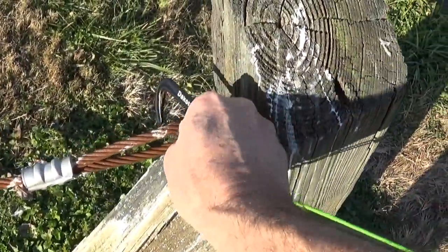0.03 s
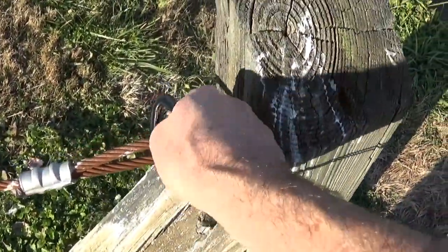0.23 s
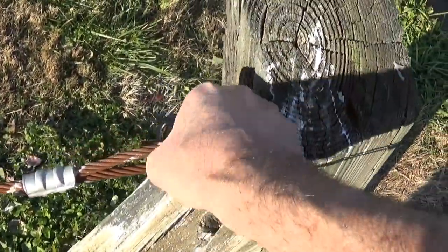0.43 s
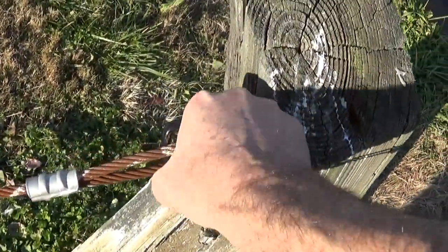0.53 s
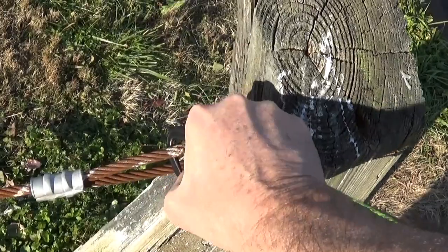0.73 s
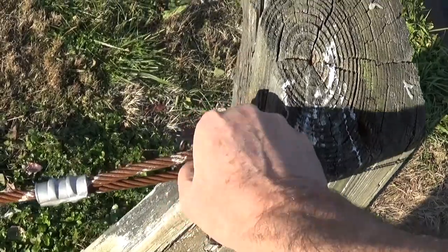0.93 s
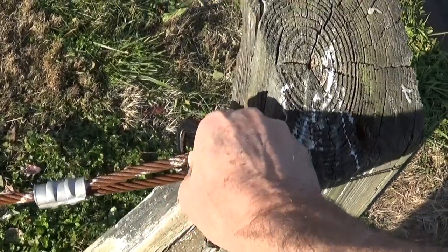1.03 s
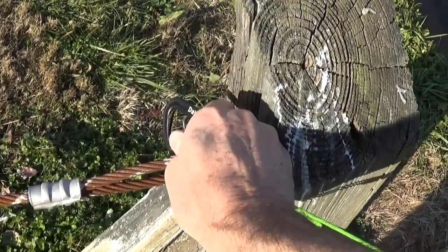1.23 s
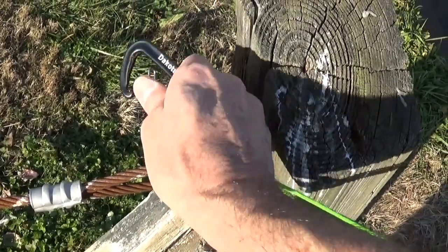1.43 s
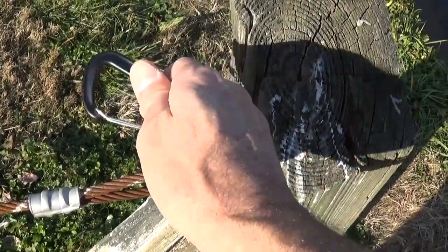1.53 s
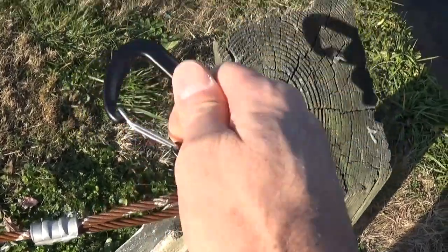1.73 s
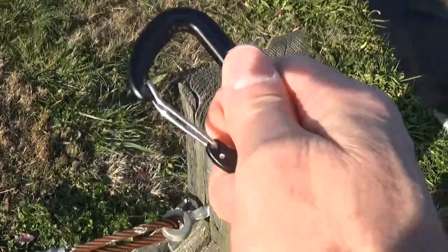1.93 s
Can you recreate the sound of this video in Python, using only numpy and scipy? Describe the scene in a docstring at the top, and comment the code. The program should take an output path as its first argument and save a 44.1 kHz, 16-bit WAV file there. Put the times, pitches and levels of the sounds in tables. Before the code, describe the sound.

A metal carabiner scrapes and clicks off a taut steel cable, then its gate snaps shut outdoors.

```python
"""A hook scrapes and knocks over the strands as a hand works a carabiner off a taut steel cable outdoors.
Random slips and snags drive damped modes and dense noise bursts of cable, fittings and hook;
single strikes ring them too. Once the hook is free, the sprung gate snaps shut: a modal ring and a crack.
Beneath lie filtered noise (grip bumps, handling rumble, a closing rush, an outdoor hush)
and one faint far whistle, a gliding sine."""
import sys
import numpy as np
from scipy import signal
from scipy.fft import rfft, irfft, next_fast_len
from scipy.io import wavfile
from scipy.ndimage import map_coordinates

SR = 44100
rng = np.random.default_rng(int(sys.argv[2]) if len(sys.argv) > 2 else 0)


def dump(signal):
    """Clip the signal to [-1, 1] and save it as 16-bit WAV at the path in sys.argv[1]."""
    limited = np.clip(np.atleast_2d(signal).T, -1, 1)
    pcm = np.round(limited * 32767).astype(np.int16)
    wavfile.write(sys.argv[1], SR, pcm)


N = 88200
T = np.arange(N) / SR
RING_T = T[:SR // 7]

# low modes of the cable and its anchor: (frequency [Hz], relative level [dB], t60 [s])
BODY_MODES = [(402, -16.5, 0.35), (657, -4.5, 0.16), (726, -14.5, 0.22), (947, -1.5, 0.056),
              (1112.6, 0.5, 0.088), (1214, 0.5, 0.048), (1233, -9.5, 0.015), (1462, -15, 0.056),
              (1515, -8, 0.15), (1580, -11, 0.18), (1950, -3, 0.031), (2182, -8, 0.072)]
# upper modes of the strands and fittings: (frequency [Hz], relative level [dB], t60 [s])
RASP_MODES = [(2844, 3, 0.06), (2860, -4, 0.034), (3191, 5, 0.054), (3460, 8, 0.031), (3504, 6, 0.013),
              (3800, -5.5, 0.029), (3990, -6, 0.054), (4500, -3, 0.062), (4820, 2, 0.019),
              (5410, -1, 0.019), (5850, -6, 0.019), (6077, 9.5, 0.015), (6770, -0.5, 0.039)]
# modes of the hook, damped by the hand: (frequency [Hz], relative level [dB], t60 [s])
HOOK_MODES = [(6290, -4.5, 0.017), (7220, -11, 0.032), (8000, -2, 0.0087), (8570, -6, 0.016),
              (8970, 1, 0.011), (10500, -22, 0.02), (13100, -10, 0.021)]
# colour of the dense, short-lived vibration of the cable body: (frequency [Hz], gain [dB])
BODY_TONE = [(60, -48), (250, -37.5), (430, -10), (690, 1.5), (1100, 3), (1550, 3), (1780, -7), (2200, -4),
             (4500, -60)]
# colour of the dense vibration of strands and fittings: (frequency [Hz], gain [dB])
RASP_TONE = [(1000, -48), (2200, -8), (3000, 2.5), (4000, -2), (6200, 2.5), (7500, -22), (12000, -52)]

# left minus right [dB]
CABLE_PAN_DB, HOOK_PAN_DB, GATE_PAN_DB = -1.1, 0.5, 1
ATTACK_S = .0002  # time constant of the onset of every ring and crack


def scraping():
    """Slips excite the cable body; sparser snags join them in strands and hook, on changing spots."""
    # hook drags: (start [s], length [s], cable body level [dB], cable rasp level [dB], hook hiss level [dB]),
    # cable levels before its filters
    strokes = [(0.109, 0.041, -57.5, -61, -54), (0.166, 0.0072, -40.5, -48, -34),
               (0.196, 0.04, -53, -61.5, -59.5), (0.279, 0.018, -49, -62, -54.5),
               (0.315, 0.015, -47.5, -55.5, -50.5), (0.346, 0.017, -42, -44.5, -49),
               (0.373, 0.044, -45.5, -58.5, -63), (0.426, 0.0081, -39, -40.5, -42.5),
               (0.442, 0.038, -53, -59, -64), (0.483, 0.018, -45, -44.5, -43.5),
               (0.514, 0.022, -46.5, -46, -47.5), (0.537, 0.023, -56.5, -62, -63),
               (0.774, 0.0086, -42.5, -43.5, -48.5), (0.792, 0.0094, -39.5, -38.5, -45),
               (0.806, 0.015, -41, -42.5, -53), (0.833, 0.015, -42, -48.5, -58),
               (0.919, 0.025, -46.5, -49, -59.5), (0.952, 0.027, -43.5, -47.5, -57),
               (0.992, 0.029, -47.5, -49.5, -58), (1.027, 0.029, -44.5, -39.5, -50.5),
               (1.065, 0.039, -42, -46, -52), (1.12, 0.1, -47.5, -53, -58.5),
               (1.22, 0.023, -46, -52, -48.5), (1.25, 0.027, -42, -45.5, -43),
               (1.295, 0.04, -60, -62.5, -53.5), (1.349, 0.023, -72, -61, -53.5),
               (1.376, 0.017, -55, -58.5, -48), (1.401, 0.04, -69, -55.5, -52.5),
               (1.42, 0.024, -52.5, -54, -58)]
    # spot the hook bears on, which decides the modes that speak most:
    # (time [s], body centre [Hz], rasp centre [Hz])
    spots = [(.19, 835, 4500), (.34, 1390, 3080), (.38, 744, 3400), (.43, 1270, 4260), (.8, 1530, 3560),
             (.95, 900, 4080), (1.03, 1260, 4430), (1.2, 990, 2830), (1.38, 1860, 5430)]
    # colour of the hook's dense vibration: (frequency [Hz], gain [dB])
    hiss_tone = [(2500, -27.5), (5000, -3.5), (7000, -2), (8800, -5), (10500, 2.5), (12500, -13),
                 (16000, -14.5)]
    # colour of all scraping on the cable, fuller near 420 Hz, a slight dip near 780 Hz:
    # (frequency [Hz], gain [dB])
    scrape_tone = [(420, 5.5), (780, -2), (1250, 2)]
    attack_s, release_s = 0.0026, 0.0039  # exponential time constants
    slips_per_s, snags_per_s, snag_db = 5000, 350, -2
    grip = amp(2.5 * wobble(260))  # the hook catches and lets go: spread in dB, knots a second
    detune = .015  # modes shift a little as the hook slides
    mode_spread_db = 2.6  # mode levels differ from stroke to stroke
    spot_octaves, spot_skirt_db = .33, -1

    slips = unit(slipping(slips_per_s) * grip)
    snags = unit(slips + amp(snag_db) * slipping(snags_per_s) * grip ** 2)
    cable, hook = np.zeros((2, N))
    spot_s, *centres = np.transpose(spots)
    # track, drive, modes, colour, dense burst against the ring [dB]
    parts = [(cable, slips, BODY_MODES, BODY_TONE, -1),
             (cable, snags, RASP_MODES, RASP_TONE, -4),
             (hook, snags, HOOK_MODES, hiss_tone, 2)]
    for s, length, *levels in strokes:
        near = (T > s - .03) & (T < s + length + .05)
        t = T[near]
        rise = np.minimum(t - s, 0) / attack_s
        fall = np.maximum(t - s - length, 0) / release_s
        shape = np.exp(rise - fall)
        for db, centre, part in zip(levels, centres + [None], parts):
            track, drive, modes, colour, dense_db = part
            shifted = np.array(modes) * [1 + detune * rng.standard_normal(), 1, 1]
            answer = ring(shifted, mode_spread_db) + amp(dense_db) * crack(colour, t60=0.0053)
            if centre is not None:  # only the cable changes with the spot
                spot_hz = np.interp(s + length / 2, spot_s, centre)
                answer = coloured(answer, hump(spot_hz, spot_octaves, spot_skirt_db))
            answer = answer / np.linalg.norm(answer)
            add(track, t[0], amp(db) * signal.fftconvolve(drive[near] * shape, answer))
    return placed(thin(coloured(cable, scrape_tone)), CABLE_PAN_DB) + placed(hook, HOOK_PAN_DB)


def slipping(rate):
    """Random slips of uneven size, rms 1; rate is their mean number a second."""
    happens = rng.random(N) < rate / SR
    direction = rng.choice([-1, 1], N)
    size = amp(2.5 * rng.standard_normal(N))
    return unit(happens * direction * size)


def contacts():
    """Each strike knocks the cable and draws a bright tick from the hook; lighter ones crack longer."""
    # strikes: (time [s], cable body level [dB], cable rasp level [dB], hook tick level [dB],
    # tick centre [Hz]), cable levels before its filter
    strikes = [(0.1214, -74, -56, -47, 8400), (0.1281, -51, -55, -48, 8850), (0.1436, -44, -53, -42, 9000),
               (.152, -49, -45.5, -46, 6750), (0.1658, -58, -47, -36.5, 7940), (.173, -33, -54, -36, 9000),
               (0.1742, -46, -48, -32, 8100), (0.3678, -29.5, -28, -26.5, 8600),
               (0.3693, -44, -33, -48, 2600), (0.475, -49.5, -51, -50.5, 9200),
               (0.8731, -49, -50, -30.5, 10700), (1.1054, -34.5, -59, -36.5, 2930),
               (1.107, -42.5, -43, -42.5, 2270), (1.1458, -47.5, -48.5, -48.5, 7800),
               (1.1792, -51, -51, -49, 7800), (1.264, -63, -37, -35, 8700), (1.2661, -43, -42.5, -32, 7640),
               (1.2733, -47, -33, -37, 8050), (1.351, -65, -75, -54, 8600), (1.376, -71, -43.5, -61, 5500),
               (1.436, -46, -74, -52.5, 2270)]
    knock_t60_s, crack_t60_s = 0.036, .0035
    knock_ring_db, clack_ring_db, tick_ring_db = -2, -7, -9  # ring against the dense burst
    tick_octaves, tick_skirt_db = 0.36, -27

    def contact_t60(db):
        """A lighter contact lasts longer: 0.4 dB of duration per dB below -28 dB."""
        return crack_t60_s * amp(0.4 * (-28 - db))

    cable, hook = np.zeros((2, N))
    for s, body_db, rasp_db, tick_db, centre_hz in strikes:
        knock = crack(BODY_TONE, knock_t60_s) + amp(knock_ring_db) * ring(BODY_MODES)
        add(cable, s, amp(body_db) * blow(knock))
        clack = crack(RASP_TONE, contact_t60(rasp_db)) + amp(clack_ring_db) * ring(RASP_MODES)
        add(cable, s, amp(rasp_db) * blow(clack))
        tick = crack(hump(centre_hz, tick_octaves, tick_skirt_db), contact_t60(tick_db))
        tick = tick + amp(tick_ring_db) * ring(HOOK_MODES)
        add(hook, s, amp(tick_db) * blow(tick))
    return placed(thin(cable), CABLE_PAN_DB) + placed(hook, HOOK_PAN_DB)


def thin(x):
    """A thin cable radiates almost no bass."""
    return coloured(x, [(100, -41.0), (250, 4), (390, -3)])


def gate():
    """The sprung gate slaps onto the nose of the hook, then settles with soft pings."""
    # modes of the free carabiner: (frequency [Hz], relative level [dB], t60 [s])
    gate_modes = [(2750, -16, .008), (3170, -14, .008), (4264, -36, .15), (4570, -28, .05),
                  (5930, -9, .012), (6170, -14, .012), (8640, -11, .016), (9227, -13, .022),
                  (9590, -1, .014), (9600, -29, .06), (11190, -6, .011), (12170, -2, .007),
                  (12480, -16, .034)]
    # colour of the slap and its fine rattle: (frequency [Hz], gain [dB])
    gate_tone = [(700, -20), (1500, -30), (2600, -5), (5000, -11), (8500, 2), (13000, 5), (15500, -3)]
    # gate chatters and settles: (time [s], level [dB])
    settles = [(1.5742, -40), (1.5915, -52), (1.6183, -45.5)]
    # colour of the settling pings: (frequency [Hz], gain [dB])
    settle_tone = [(3200, -4.5), (5000, -23), (7500, -9), (9600, -2.5), (12200, -16)]
    snap_s, ring_db, crack_db, rattle_db = 1.5647, -21.3, -22.8, -43
    crack_t60_s, rattle_t60_s = .003, .04
    extra_t60_s = 0.2  # further damping of the pings

    track = np.zeros(N)
    snap = amp(ring_db) * ring(gate_modes) + amp(crack_db) * crack(gate_tone, crack_t60_s)
    add(track, snap_s, snap + amp(rattle_db) * crack(gate_tone, rattle_t60_s))
    for s, db in settles:
        ping = coloured(ring(gate_modes) * fade(extra_t60_s), settle_tone)
        add(track, s, amp(db) * blow(ping))
    return placed(track, GATE_PAN_DB)


def bumps():
    """Short low swells of noise as the grip shifts."""
    # soft bumps: (time [s], level [dB], half length [s], pitch [Hz])
    swells = [(0.122, -53, 0.0082, 195), (0.218, -45, 0.012, 157), (0.495, -44.5, 0.0049, 135),
              (0.607, -55, 0.011, 244), (0.641, -43.5, 0.011, 175), (1.658, -66, 0.012, 123)]
    # colour around each pitch: (multiple of the pitch [ratio], gain [dB])
    bump_tone = [(.15, -30), (.6, -6), (1, -1), (1.6, -8), (3, -22.5), (8, -42)]
    out = np.zeros((2, N))
    for s, db, half_s, hz in swells:
        swell = np.exp(-.5 * ((T - s) / half_s) ** 2)
        out += amp(db) * swell * air(np.array(bump_tone) * [hz, 1], side_db=-8.5)
    return out


def handling():
    """Hand and sleeve moving near the microphones: low noise with a lumpy level."""
    # course of the rumble before its random lumps: (time [s], level [dB])
    course = [(0, -53), (.2, -56), (.29, -62), (.42, -63.5), (.48, -48.5), (.66, -58.5), (.74, -62),
              (.78, -67), (.85, -56), (.95, -73), (1.45, -75.5), (2, -77.5)]
    # colour of the rumble: (frequency [Hz], gain [dB])
    rumble_tone = [(20, -15), (50, -8.5), (82, 1.5), (160, 0), (260, -3), (400, -14), (800, -40.5),
                   (2000, -46)]
    level_db = np.interp(T, *np.transpose(course)) + 4.1 * wobble(35.87)
    return amp(level_db) * air(rumble_tone, side_db=-10.0)


def rush():
    """A soft swelling rush of noise as the arm is raised."""
    # course of the rush: (time [s], level [dB])
    course = [(1.7, -72), (1.85, -67.5), (1.93, -59), (2, -59)]
    # colour of the rush: (frequency [Hz], gain [dB])
    rush_tone = [(150, -32.5), (380, -3), (650, -7), (1100, -14), (3000, -23.5), (9000, -20), (16000, -50)]
    return amp(np.interp(T, *np.transpose(course))) * air(rush_tone, side_db=-20)


def whistle():
    """One faint note far away: a slightly unsteady sine, arched in pitch and level."""
    start_s, length_s, base_hz, arch_hz, peak_db = 1.63, 0.096, 1160, 129, -64.5
    arch = np.sin(np.pi * np.clip((T - start_s) / length_s, 0, 1))
    hz = base_hz + arch_hz * arch + 25 * wobble(180)
    return amp(peak_db) * arch * np.sin(2 * np.pi * np.cumsum(hz) / SR)


def hush():
    """The steady outdoor hush: wide coloured noise."""
    # colour of the hush: (frequency [Hz], gain [dB])
    hush_tone = [(90, -11), (400, -0.5), (1000, -0.5), (3000, -4), (5500, -9.5), (8200, -5.5),
                 (11000, -11.5), (15500, -18.5)]
    return amp(-59) * air(hush_tone, side_db=-5.5)


def ring(modes, scatter_db=2):
    """Damped modes, each excited with a random sign and a slightly different level every time."""
    x = np.zeros(len(RING_T))
    for hz, db, t60 in modes:
        scatter, sign = rng.standard_normal(2)
        level = amp(db + scatter_db * scatter) * np.sign(sign)
        x += level * fade(t60) * np.cos(2 * np.pi * hz * RING_T)
    return blow(x * onset())


def crack(colour, t60):
    """A dense noise burst with a weak tail from nearby surfaces."""
    tail = amp(-18) * fade(0.041)
    shape = (fade(t60) + tail) * onset()
    return blow(coloured(rng.standard_normal(len(RING_T)) * shape, colour))


def onset():
    """Rapid exponential rise of a struck part."""
    return -np.expm1(-RING_T / ATTACK_S)


def fade(t60):
    """Exponential decay by 60 dB in t60 seconds."""
    return np.exp(-np.log(1000) * RING_T / t60)


def hump(centre_hz, octaves, skirt_db):
    """(frequency [Hz], gain [dB]) points of a bell on a flat skirt."""
    hz = np.geomspace(100, SR / 2, num=80)
    bell = np.exp(-.5 * (np.log2(hz / centre_hz) / octaves) ** 2)
    return np.c_[hz, 20 * np.log10(bell + amp(skirt_db))]


def coloured(x, colour):
    """Causal minimum-phase filter through (frequency [Hz], gain [dB]) points, by the folded cepstrum."""
    m = 2 * next_fast_len(x.shape[-1])
    f, db = np.transpose(colour)
    bins_hz = np.fft.rfftfreq(m, 1 / SR)
    gain = amp(np.interp(np.log(bins_hz + 1), np.log(f), db))
    cep = irfft(np.log(gain))
    cep[1:m // 2] *= 2
    cep[m // 2 + 1:] = 0
    return irfft(rfft(x, m) * np.exp(rfft(cep, m)), m)[..., :x.shape[-1]]


def placed(x, pan_db):
    """A close source, panned and slightly widened by reflections off hand and post."""
    side = signal.fftconvolve(x, rng.standard_normal(len(RING_T)) * fade(0.022))[:N]
    side = unit(side) * x.std() * amp(-19.5)
    return np.array([x * amp(pan_db / 2) + side, x * amp(-pan_db / 2) - side])


def air(colour, side_db):
    """Stereo noise of rms 1; side_db sets its width."""
    mid, side = coloured(rng.standard_normal((2, N)), colour)
    side = amp(side_db) * side
    return unit(np.array([mid + side, mid - side]))


def wobble(rate):
    """A smooth random curve, rate knots a second."""
    return map_coordinates(rng.standard_normal(2048), [T * rate], mode="wrap")


def amp(db):
    """Decibels to gain."""
    return 10 ** (np.asarray(db) / 20)


def unit(x):
    """Scale to rms 1."""
    return x / np.sqrt(np.mean(x ** 2) + 1e-20)


def blow(x):
    """Scale a ring to the energy of 10 ms at rms 1."""
    return x * np.sqrt(.01 * SR / np.sum(x ** 2))


def add(track, s, x):
    """Mix x into the track at time s."""
    part = track[max(round(s * SR), 0):][:len(x)]
    part += x[:len(part)]


def scene():
    """All sources at the two microphones."""
    carabiner = scraping() + contacts() + gate()
    return carabiner + bumps() + handling() + rush() + whistle() + hush()


def record(dry):
    """A very steep low-pass limits the band to about 16 kHz."""
    top_hz = 16100
    m = next_fast_len(N + SR // 2)
    gain = 1 / (1 + (np.fft.rfftfreq(m, 1 / SR) / top_hz) ** 120)
    return irfft(rfft(dry, m) * gain, m)[:, :N]


dry = scene()
out = record(dry)
dump(out)
```